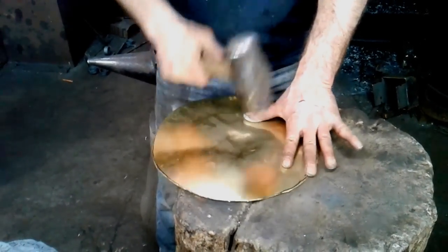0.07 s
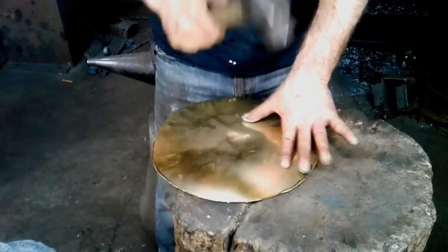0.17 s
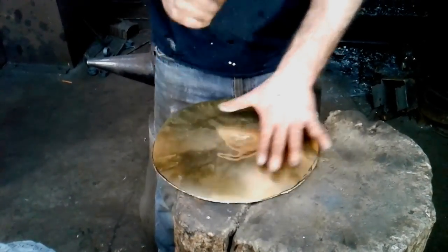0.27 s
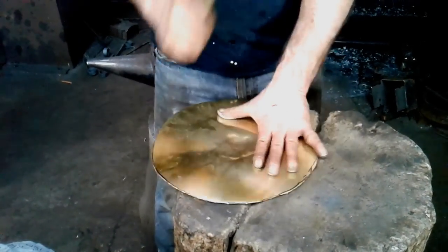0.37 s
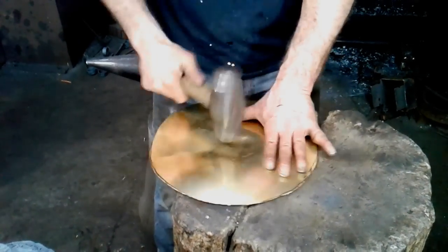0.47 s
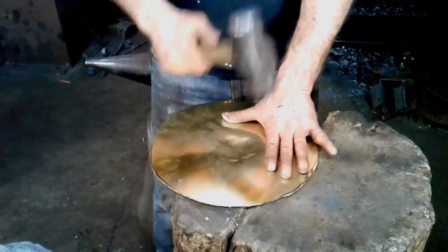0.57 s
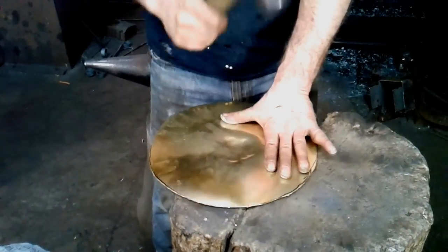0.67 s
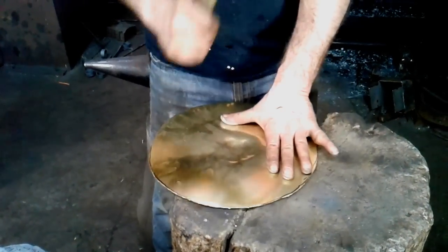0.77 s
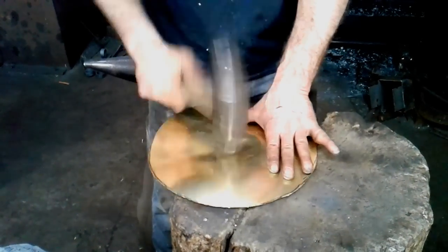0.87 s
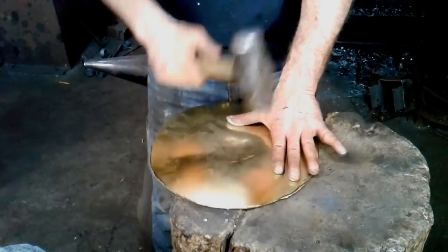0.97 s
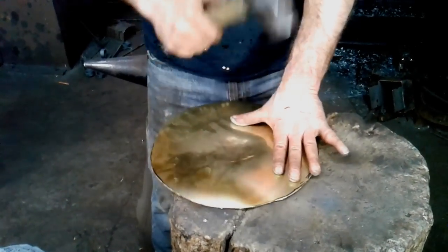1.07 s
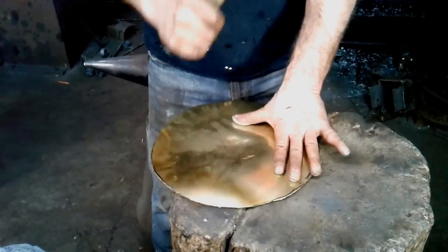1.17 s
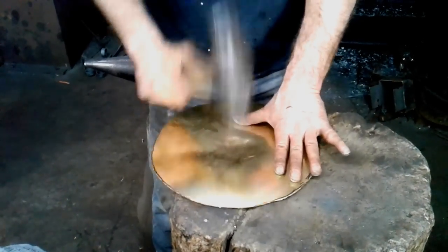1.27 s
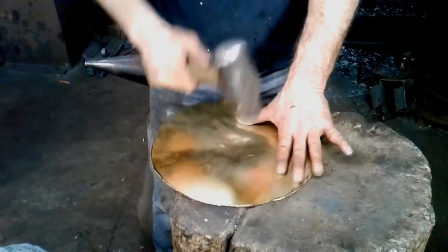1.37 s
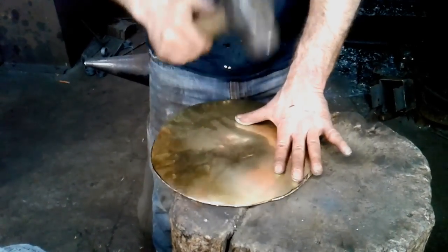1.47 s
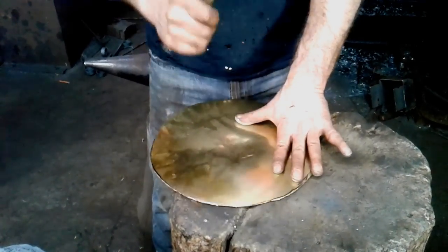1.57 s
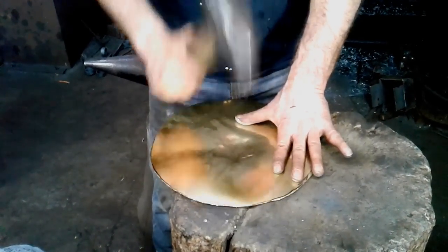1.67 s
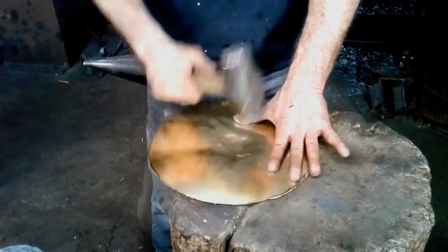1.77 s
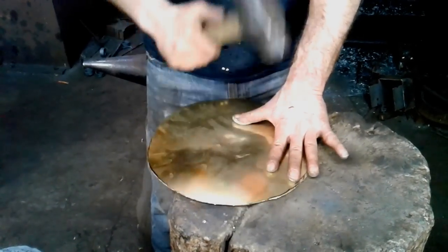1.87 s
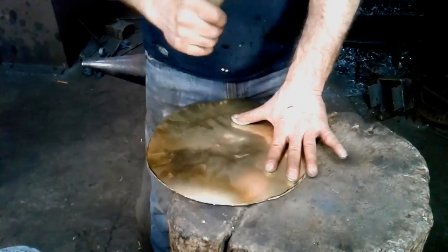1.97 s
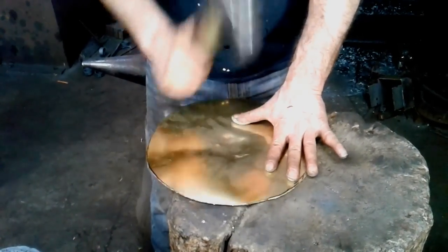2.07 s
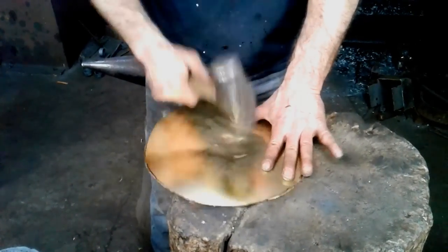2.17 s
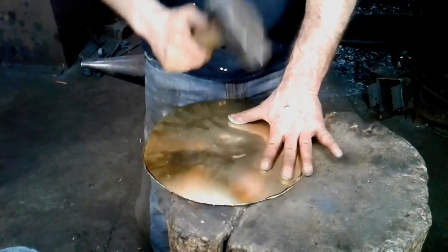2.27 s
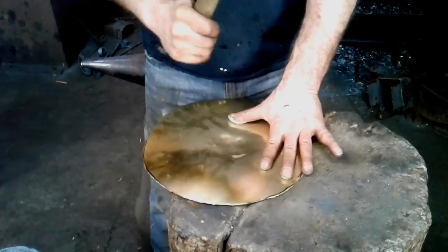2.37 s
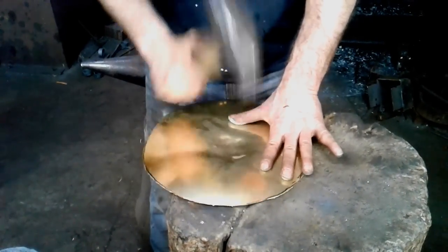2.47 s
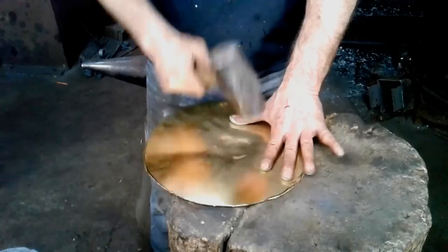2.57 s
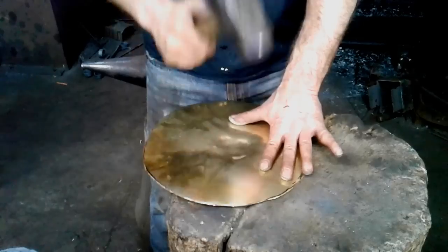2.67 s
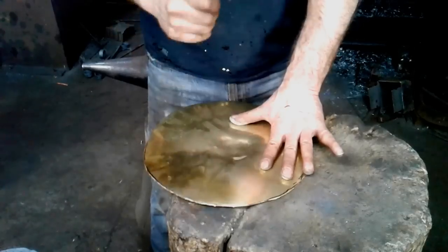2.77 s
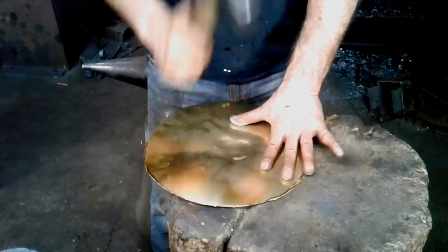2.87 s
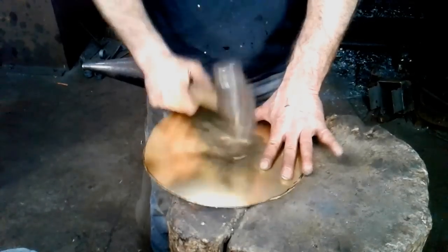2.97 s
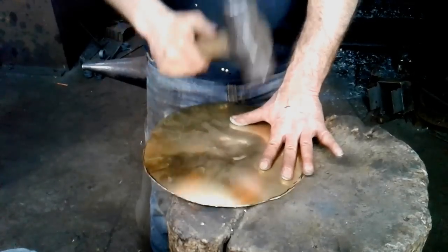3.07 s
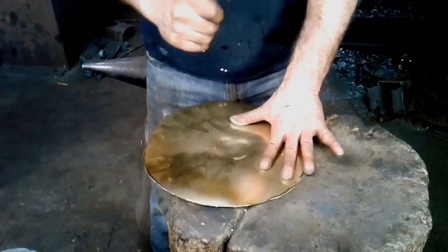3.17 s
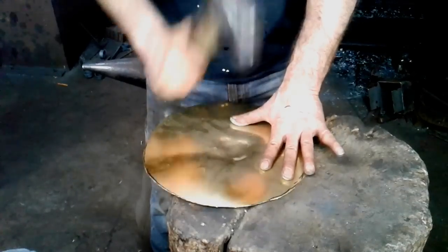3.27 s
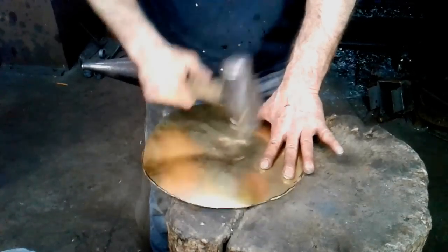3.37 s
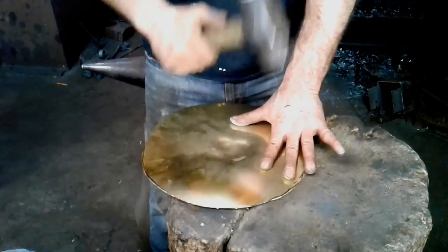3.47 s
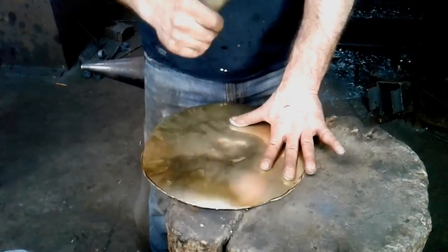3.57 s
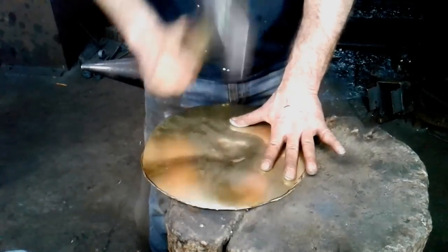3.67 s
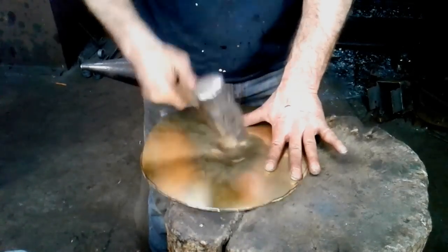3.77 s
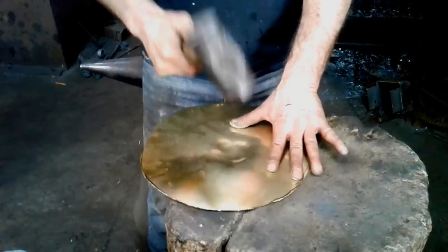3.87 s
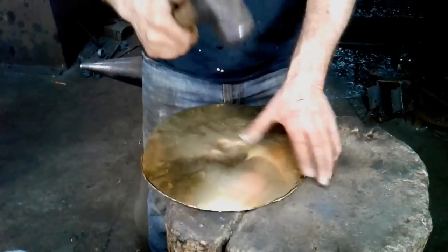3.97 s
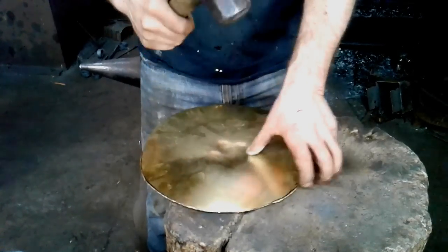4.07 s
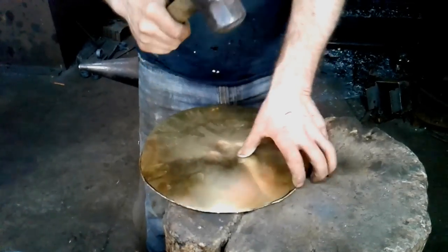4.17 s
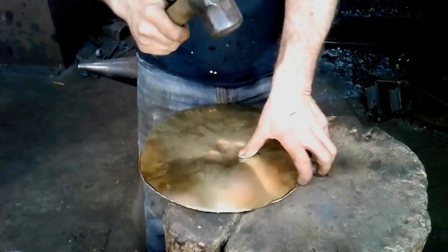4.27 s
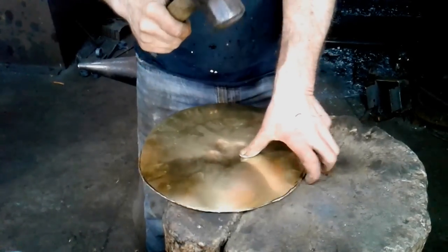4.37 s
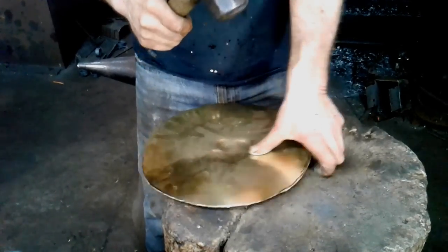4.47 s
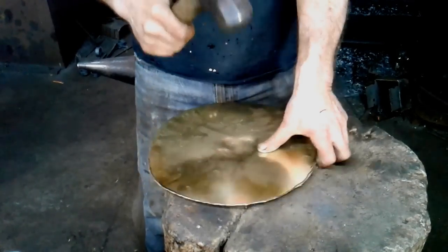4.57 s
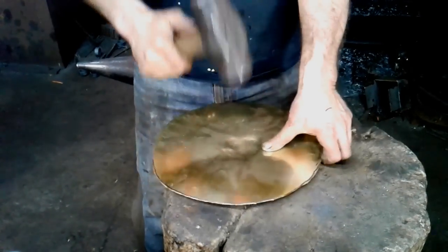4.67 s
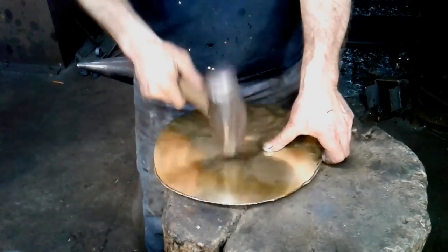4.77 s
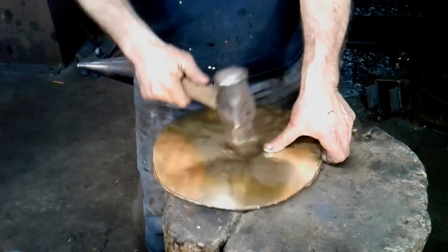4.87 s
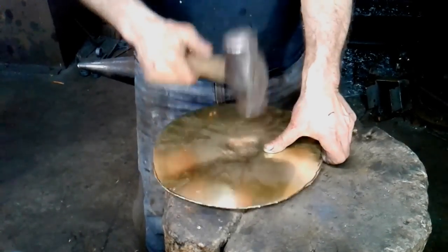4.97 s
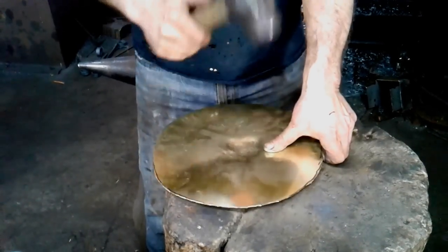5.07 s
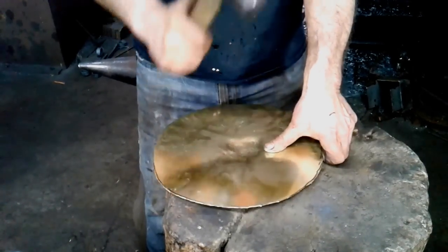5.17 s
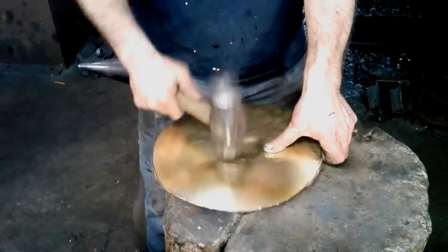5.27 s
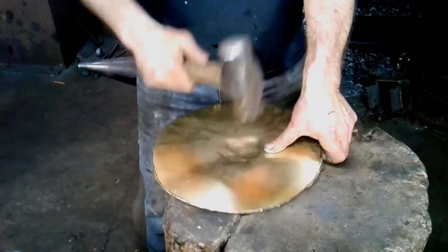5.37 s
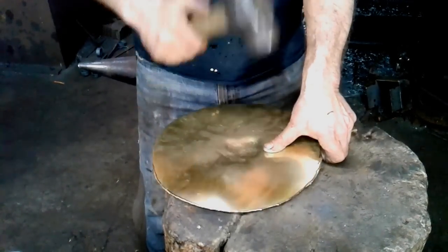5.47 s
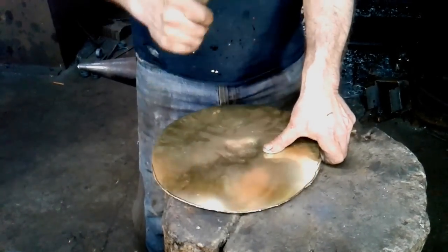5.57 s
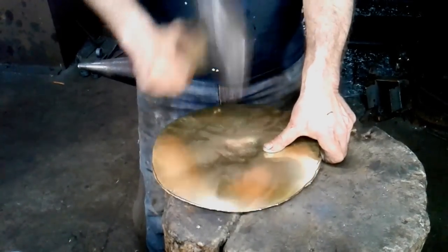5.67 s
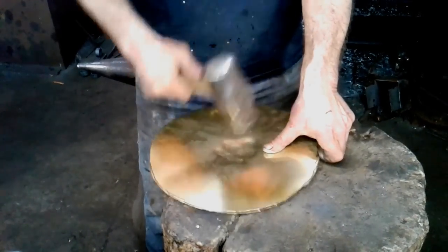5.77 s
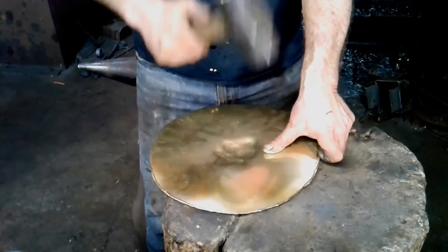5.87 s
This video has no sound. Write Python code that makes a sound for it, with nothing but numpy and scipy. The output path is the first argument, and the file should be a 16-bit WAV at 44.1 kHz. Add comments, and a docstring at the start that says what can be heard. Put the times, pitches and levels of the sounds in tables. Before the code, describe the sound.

A hammer clashes on a thin brass disc over a wooden stump, loud, overloaded blows with short metallic ring in a hard-walled workshop.

```python
"""Hammer blows on a brass disc

A smith hammers a brass disc held down on a wooden stump in a hard-walled workshop, over a mains hum.
Each blow sums decaying noise (crack), stump modes (thud), crowded plate modes (clash) and a ring of free modes.
Between blows the rim ticks on the wood as short bursts of band-passed noise; decaying noise forms the room.
The blows overload the close microphone, and hard, firm ones also choke it for a moment."""
import sys
import numpy as np
from scipy import signal
from scipy.fft import rfft, irfft, next_fast_len
from scipy.io import wavfile

SR = 44100
rng = np.random.default_rng(int(sys.argv[2]) if len(sys.argv) > 2 else 0)


def wav_record(signal):
    """Record a signal, one row per channel, as 16-bit PCM in the file named by sys.argv[1]."""
    frames = np.transpose(np.atleast_2d(signal))
    bounded = np.clip(frames, -1, 1)
    # unit amplitude maps onto the largest positive 16-bit level
    quanta = np.round(bounded * 32767).astype(np.int16)
    wavfile.write(sys.argv[1], SR, quanta)


N = 260631

# Hammer blows: t/s, relative force level/dB, firmness of the disc on the stump under the hammer (0-1),
# spectral tilt/(dB per octave), relative level of the free ring/dB, centre of the free ring f/Hz
BLOWS = [ (-0.27, 4, .8, .5, -22, 990), (0.1441, 1.5, 0.63, .6, .5, 790), (0.5971, -5, 0.17, 0, 15.5, 742),
         (1.015, -3, 0.02, 0.3, 5, 730), (1.424, -.5, .4, 0.9, -4, 746), (1.8442, 0, 0.18, 0.65, -5, 2070),
         (2.253, 0, 0.85, 0.23, -6, 930), (2.6278, -4, 0, -0.27, 0.5, 1750),
         (3.056, 2.5, 0.95, .5, -1, 1670), (3.4697, 1.5, 0.46, .5, 3, 1580),
         (3.8647, -2, 0.75, 0.05, 3.5, 690), (4.9204, -10, 0.26, .5, 5, 825),
         (5.3911, -1.5, 0.09, 0.67, 10, 1540), (5.8326, -1, 0.01, 0.45, 10, 1590), ]
# Rim of the disc ticking, scuffing and slapping on the stump: t/s, relative level/dB, t60/s
TICKS = [(4.163, -33, .015), (4.189, -31.5, .013), (4.201, -35, .013), (4.211, -33, .016),
         (4.353, -24.5, .011), (4.399, -35, .025), (4.4185, -30, .013), (4.605, -39.5, .11),
         (4.985, -6, .03), (5.065, -28, .03)]
# Strong modes of the disc: nominal f/Hz, relative level/dB, t60/s
DISC_MODES = [(323.3, 11, 0.24), (469.5, 5, .22), (587.7, 0, 0.26), (648, 2, 0.2), (684, -5, 0.27),
              (856, -8, 0.2), (904, -1.5, 0.38), (978, 3, 0.43), (998, 2, 0.39), (1047, 0.5, .35),
              (1097, -4, 0.28), (1237, -2, 0.27), (1297, -2.5, 0.39), (1325, -15, .3), (1470, -10, 0.23),
              (1530, -6, 0.35), (2040, -4, 0.28), (2034, -4, 0.3), (2260, 9, .2), (3245, 18, 0.15),
              (3670, 9, 0.13), (4130, 14, 0.17), (5300, -3, 0.13), (5430, 1, .3), (5940, 4, 0.15),
              (6430, 21, 0.15)]
# Spectrum of the impact and of the dense plate modes: f/Hz, relative level/dB
CLASH = [(60, -14), (200, -1.5), (350, -3), (600, 0.5), (1000, -1), (1600, -0.5), (2500, -0.5), (3250, 1),
         (4300, 0.5), (6300, -1), (8000, -5), (11000, -13.5), (16000, -65)]
# Modes of the knocked stump: f/Hz, relative level/dB, t60/s
STUMP_MODES = [(103, 1, 0.038), (158, -3.5, 0.096), (209.3, -1, 0.11), (274.6, 0.5, 0.096),
               (318.6, -1, 0.11), (364, -1.5, 0.084)]
# Reverberation time of the workshop: f/Hz, t60/s
WORKSHOP_T60 = [(100, 0.33), (300, 0.63), (900, 0.68), (2000, 0.62), (4000, 0.38), (6500, 0.35),
                (9000, 0.28), (15000, 0.29)]
# Mains hum reaching the microphone: f/Hz, rms level/dB
HUM = [(119.6, -45.5), (240.5, -58.5), (291, -58), (508, -64)]
# Spectral density of the steady rush: f/Hz, relative level/dB
AIR = [(25, -11.5), (50, 1), (90, 4), (250, 2.5), (450, -3.5), (900, -5.5), (2000, -12), (4000, -16.5),
       (6800, -16), (8500, -20), (10500, -32), (15000, -44)]
# Frequency response of the microphone: f/Hz, level/dB
MICROPHONE = [(100, 1), (2000, 0), (4500, .5), (6700, 3), (8000, -1.5), (10500, -8), (16000, -9)]

OVERLOAD = 0.48   # amplitude that the saturation approaches
CUTOFF_HZ = 16000
# A loose disc buzzes against the wood; a firmly seated one gives a short crack
LOOSE_CRACK_T60_S, FIRM_CRACK_T60_S = 0.072, 0.0088
# The stump gives way, so its thud grows by only a share of the force (dB per dB)
THUD_FOLLOWS = 0.45
# Scale of the choking bias for a fully firm blow of 0 dB, in units of OVERLOAD, before its envelope
FIRM_CHOKE = 4.74
# Harder and longer contacts reach lower: lower band edge of a 0 dB contact lasting TICK_T60_S,
# and the rise in level that lowers the edge by an octave
TICK_EDGE_HZ, TICK_T60_S, TICK_DB_PER_OCTAVE = 2130, 0.019, 25.5


def from_db(db):
    """Level: an amplitude ratio is ten to the power of dB / 20."""
    return 10 ** (np.asarray(db) / 20)


def unit_energy(x):
    """Normalisation: the squares of the samples sum to one."""
    return x / np.sqrt(np.sum(x ** 2) + 1e-20)


def seconds(length):
    """Sampling: the instants of a stretch of the given length in s."""
    return np.arange(int(length * SR)) / SR


def at_hz(points, hz):
    """Interpolation: a table is read along a logarithmic frequency axis."""
    points = np.array(points)
    return np.interp(np.log(np.maximum(hz, 1)), np.log(points[:, 0]), points[:, 1])


def colour(x, points):
    """Linear filtering: the spectrum is multiplied by a smooth real gain."""
    size = next_fast_len(len(x) + SR // 10)
    gain = from_db(at_hz(points, np.fft.rfftfreq(size, 1 / SR)))
    return irfft(rfft(x, size) * gain, size)[:len(x)]


def dying(t, t60):
    """Exponential decay: the amplitude falls by 60 dB in t60."""
    return np.exp(-np.log(1000) * t / np.maximum(t60, 1e-4))


def ringing(hz, t60, t):
    """Modal vibration: each mode is a decaying sine, one per row."""
    return np.sin(2 * np.pi * hz[:, None] * t) * dying(t, t60[:, None])


def add(track, s, sound):
    """Superposition: a sound is summed into a track from time s, cut to the track's ends."""
    start = int(round(s * SR))
    sound = sound[max(-start, 0):max(len(track) - start, 0)]
    track[max(start, 0):max(start, 0) + len(sound)] += sound


def workshop(build_s=0.0043, walls_s=0.035, walls_width_s=0.011, walls_gain=0.32):
    """Reverberation: reflections thicken, bunch up as the near walls answer, and decay at a rate set by pitch."""
    t = seconds(1)
    hz = np.fft.rfftfreq(len(t), 1 / SR)
    white = rfft(rng.standard_normal(len(t)))
    centres = np.geomspace(100, 15000, 13)
    decay = 0
    # each row of the identity gives one overlapping triangular band
    for centre, share in zip(centres, np.eye(len(centres))):
        band = irfft(white * at_hz(np.c_[centres, share], hz), len(t))
        decay = decay + band * dying(t, at_hz(WORKSHOP_T60, centre))
    walls = 1 + walls_gain * np.exp(-.5 * ((t - walls_s) / walls_width_s) ** 2)
    build_up = 1 - np.exp(-t / build_s)
    return unit_energy(decay * walls * build_up)


def crack_length(firmness):
    """Contact damping: the firmer the disc sits, the shorter the t60 of the crack."""
    return LOOSE_CRACK_T60_S * (FIRM_CRACK_T60_S / LOOSE_CRACK_T60_S) ** np.clip(firmness, 0, 1)


def reach(hz, centre, octaves=0.36):
    """Selective damping: the spot struck and the grip of the hand leave modes around one pitch free to ring."""
    return np.exp(-.5 * (np.log2(hz / centre) / octaves) ** 2)


def clash(t60=0.098, damping_slope=0.035, free_db=-9, count=640):
    """Modal density: a thin plate has evenly crowded modes, weighted anew by each blow; one row a blow."""
    t = seconds(.2)
    _, _, _, bright, free, centre = np.transpose(BLOWS)[:, :, None]
    hz = 200 + (np.arange(count) + rng.random(count)) * 14000 / count
    modes = ringing(hz, t60 * (hz / 2000) ** -damping_slope, t)
    spectrum = from_db(at_hz(CLASH, hz) + bright * np.log2(hz / 2000))
    freedom = 1 + from_db(free + free_db) * reach(hz, centre)
    weights = spectrum * freedom
    # each blow lands elsewhere on the mode shapes
    weights = weights * rng.standard_normal(weights.shape) / np.sqrt(count)
    return np.pad(weights @ modes, ((0, 0), (0, SR - len(t))))


def disc_ring(free, centre, held_db=-13, detune=0.0033):
    """Free vibration: strong modes all sound a little, free ones sing out, and each new dent shifts their pitches."""
    t = seconds(.5)
    hz, db, t60 = np.transpose(DISC_MODES)
    modes = ringing(hz * (1 + detune * rng.standard_normal(len(hz))), t60, t)
    freedom = from_db(held_db) + from_db(free) * reach(hz, centre)
    signs = rng.choice([-1, 1], len(hz))
    return np.pad((from_db(db) * freedom * signs) @ modes, (0, SR - len(t)))


def hammering(clash_db=6.5, crack_db=13, scatter_db=32.5, thud_db=-18.5, ring_db=-21.5,
              direct_db=-8, ring_room_db=-2.5):
    """Impact excitation: steel on brass excites crack, plate, stump and disc ring, all answered by the room."""
    t, out = seconds(1), np.zeros(N)
    stump_hz, stump_db, stump_t60 = np.transpose(STUMP_MODES)
    stump = ringing(stump_hz, stump_t60, t)
    signs = (-1) ** np.arange(len(stump))   # neighbouring modes start in opposite phase
    plates, rooms = clash(), [workshop() for _ in BLOWS]
    for k, (s, force, firmness, bright, free, centre) in enumerate(BLOWS):
        # crack and disc body are answered by two different noise reverberations;
        # the body's is the one that the blow before used for its crack (the first blow takes the last one's)
        crack_room, body_room = rooms[k], rooms[k - 1]

        crack = from_db(crack_db) * rng.standard_normal(len(t)) * dying(t, crack_length(firmness))
        tone = [(hz, db + bright * np.log2(hz / 2000)) for hz, db in CLASH]
        impact = colour(crack + from_db(scatter_db) * crack_room, tone)

        # the whole blow is scaled by its force below, hence the -1
        knock_levels = from_db(stump_db + (THUD_FOLLOWS - 1) * force)
        knock = (knock_levels * signs) @ stump
        body = from_db(clash_db) * plates[k] + from_db(thud_db) * knock
        ring = from_db(ring_db) * disc_ring(free, centre)

        into_room = body + from_db(ring_room_db) * ring
        echo = signal.fftconvolve(into_room, body_room)[:len(t)]
        add(out, s, from_db(force) * (impact + from_db(direct_db) * body + ring + echo))
    return out


def background(air_db=-47):
    """Stationary sound: steady sines form an electric hum over a soft rush of coloured noise."""
    t = np.arange(N) / SR
    hum = 0
    for hz, db in HUM:
        # the root of two turns rms into peak amplitude
        hum = hum + np.sqrt(2) * from_db(db) * np.sin(2 * np.pi * (hz * t + rng.random()))
    rush = np.sqrt(N) * unit_energy(colour(rng.standard_normal(N), AIR))   # rms of one
    return hum + from_db(air_db) * rush


def edge_ticks(high_hz=8500, room_db=-8):
    """Brief contact: the rim gives decaying noise whose band reaches lower for harder and longer contacts."""
    t, out = seconds(.15), np.zeros(N)
    for s, db, t60 in TICKS:
        low_hz = TICK_EDGE_HZ * 2 ** (-db / TICK_DB_PER_OCTAVE) * np.sqrt(TICK_T60_S / t60)
        band = signal.butter(2, [min(low_hz, .9 * high_hz), high_hz], "band", fs=SR, output="sos")
        contact = rng.standard_normal(len(t)) * dying(t, t60)
        add(out, s, from_db(db) * signal.sosfilt(band, contact))
    return out + from_db(room_db) * signal.fftconvolve(out, workshop())[:N]


def scene():
    """Superposition: blows, rim contacts and background sum at the microphone."""
    return (hammering() + edge_ticks() + background())[None]


def choking(delay_s=0.0018, rise_s=0.0038, recover_s=0.015):
    """Bias shift: a hard, firm blow pushes the microphone's amplifier to one rail, from which it creeps back."""
    t, bias = seconds(.2), np.zeros(N)
    envelope = (1 - np.exp(-t / rise_s)) * np.exp(-t / recover_s)
    for s, force, firmness, *_ in BLOWS:
        choke = FIRM_CHOKE * np.clip(firmness, 0, 1) * from_db(force)
        add(bias, s + delay_s, -choke * envelope)
    return bias


def record(dry, bass_cut_hz=80, hardness=2.37, squeeze=0.027):
    """Nonlinear transduction: the microphone saturates off centre, loses the deep bass and dulls the top."""
    bias = choking()
    drive = dry[0] / OVERLOAD + bias
    squashed = OVERLOAD * drive / (1 + np.abs(drive) ** hardness) ** (1 / hardness)
    squashed = squashed / (1 + squeeze * np.abs(bias))   # a choked amplifier has less swing
    bass_cut = signal.butter(3, bass_cut_hz, "high", fs=SR, output="sos")
    thinned = signal.sosfilt(bass_cut, squashed)
    top_cut = signal.ellip(10, .2, 80, CUTOFF_HZ, fs=SR, output="sos")
    return signal.sosfilt(top_cut, colour(thinned, MICROPHONE))[None]


dry = scene()
out = record(dry)
wav_record(out)
```